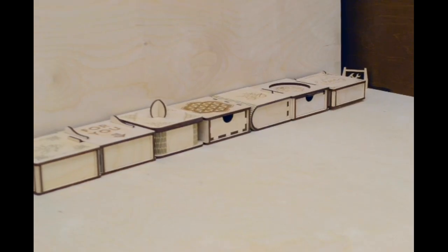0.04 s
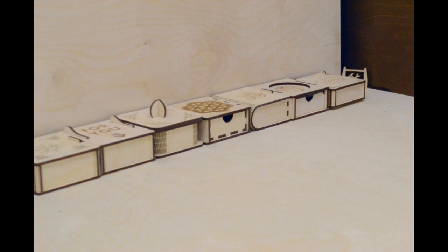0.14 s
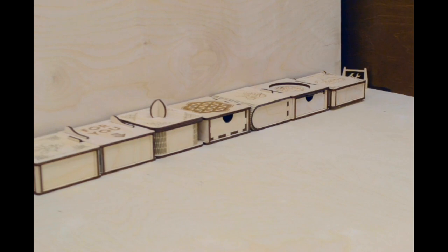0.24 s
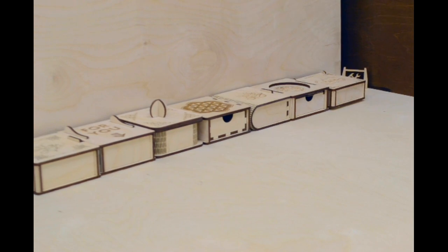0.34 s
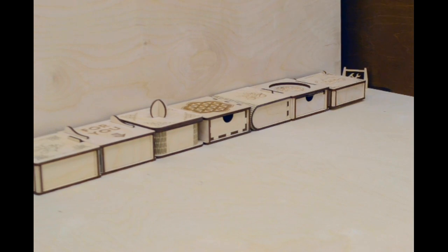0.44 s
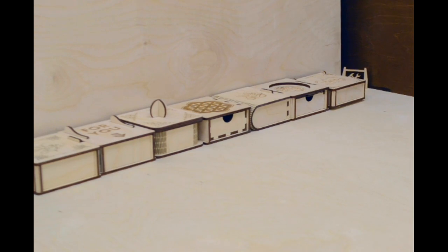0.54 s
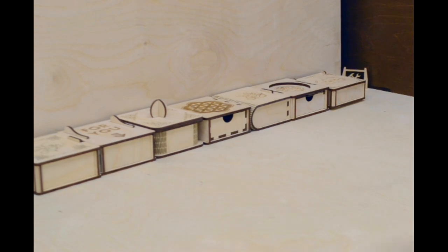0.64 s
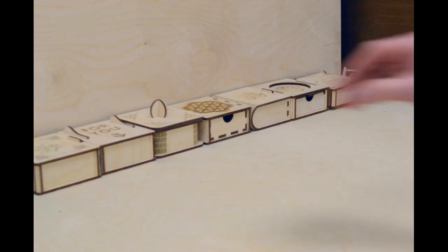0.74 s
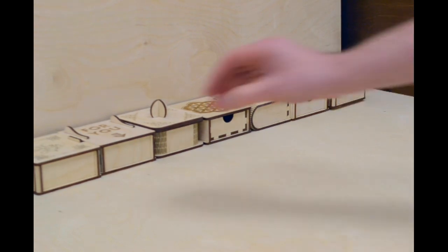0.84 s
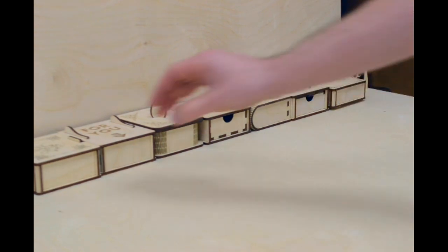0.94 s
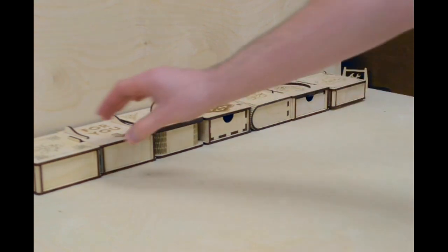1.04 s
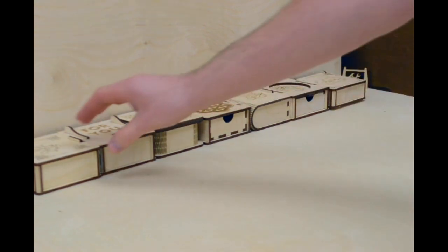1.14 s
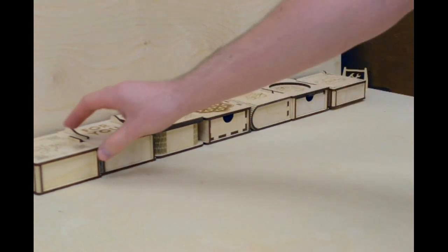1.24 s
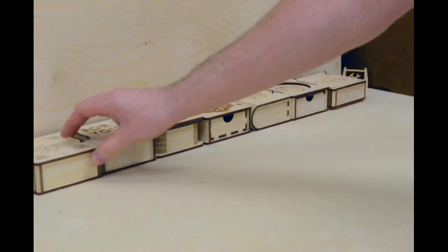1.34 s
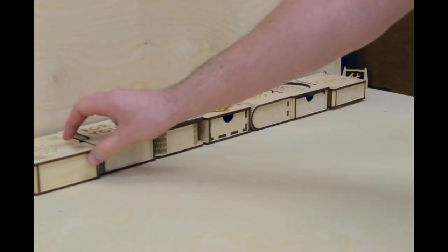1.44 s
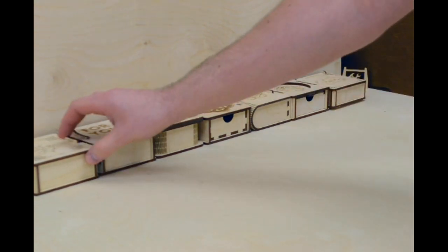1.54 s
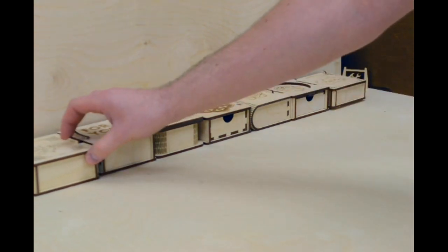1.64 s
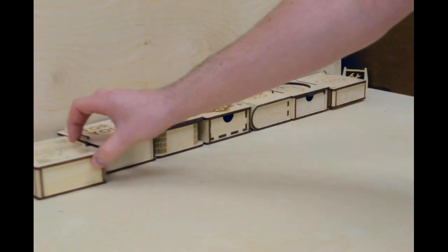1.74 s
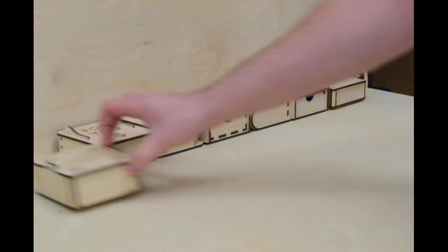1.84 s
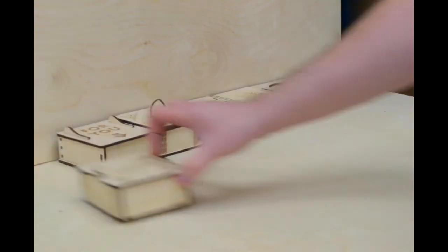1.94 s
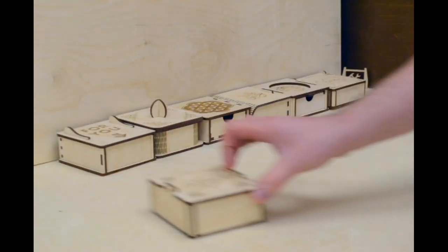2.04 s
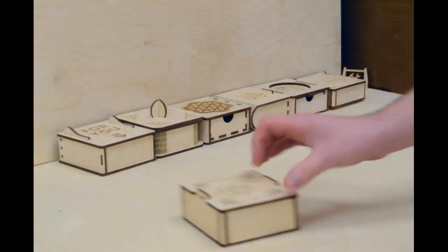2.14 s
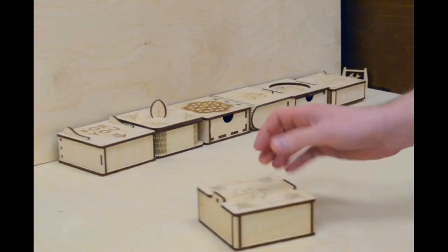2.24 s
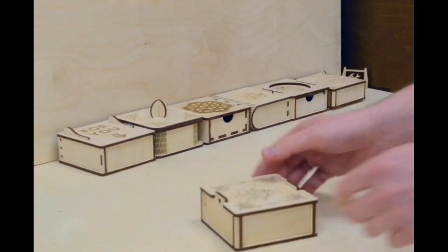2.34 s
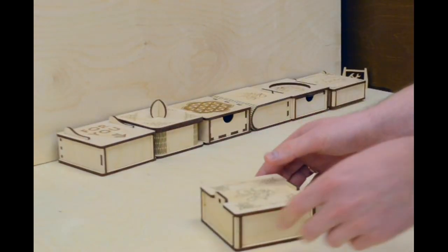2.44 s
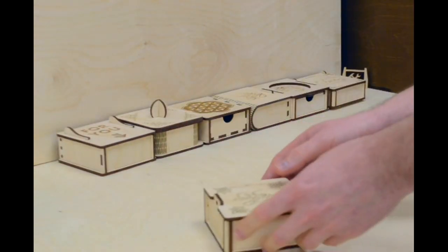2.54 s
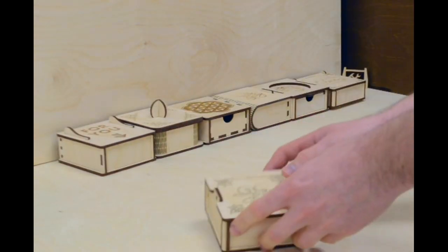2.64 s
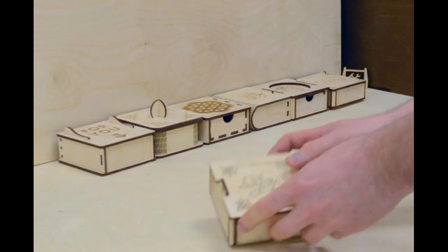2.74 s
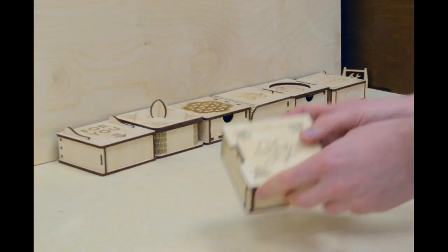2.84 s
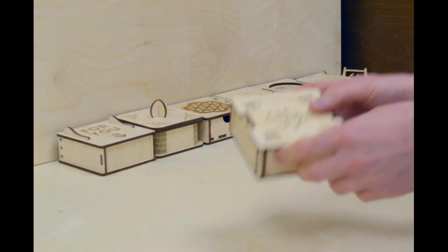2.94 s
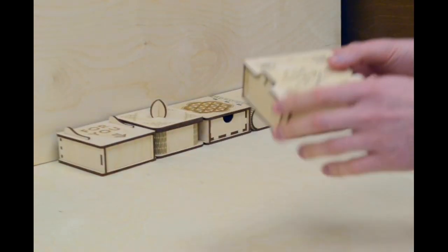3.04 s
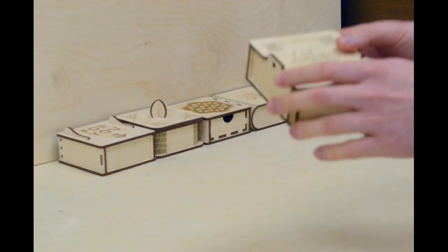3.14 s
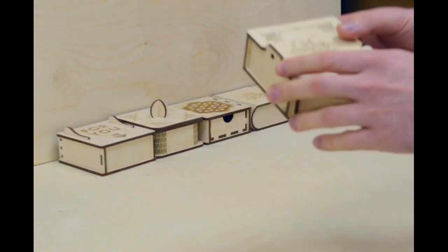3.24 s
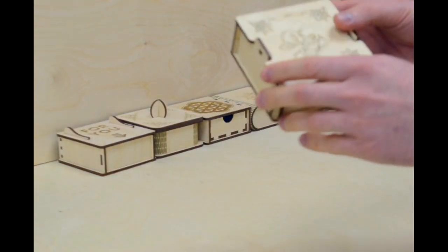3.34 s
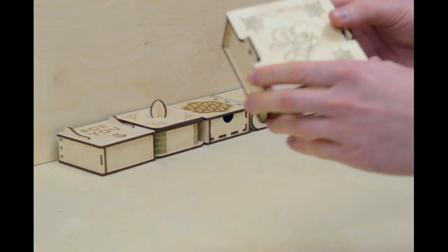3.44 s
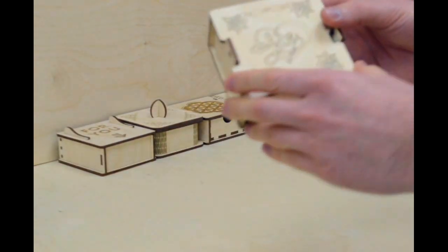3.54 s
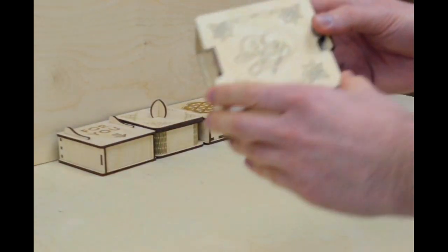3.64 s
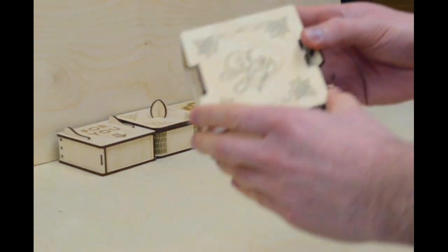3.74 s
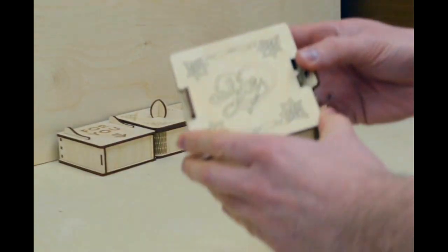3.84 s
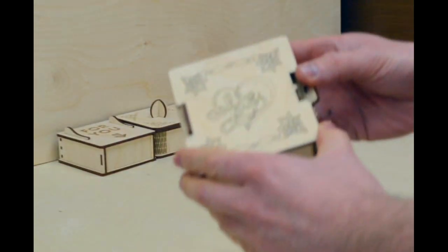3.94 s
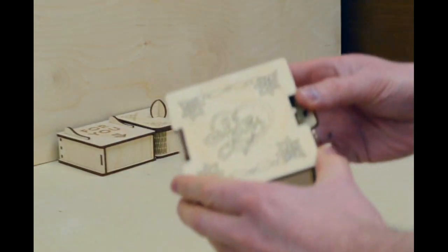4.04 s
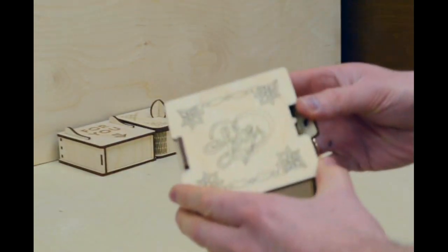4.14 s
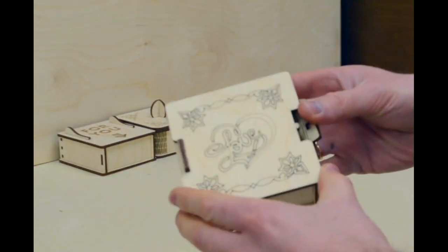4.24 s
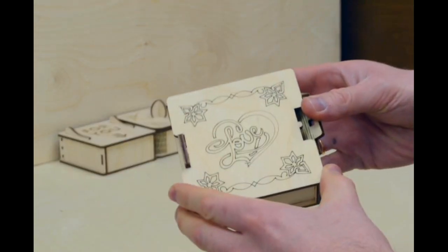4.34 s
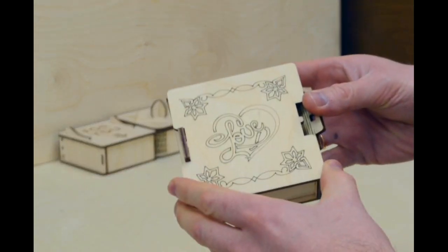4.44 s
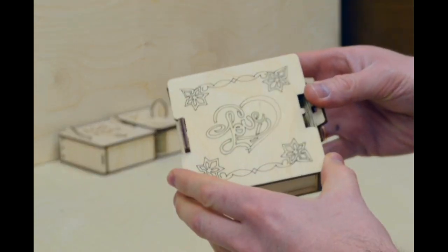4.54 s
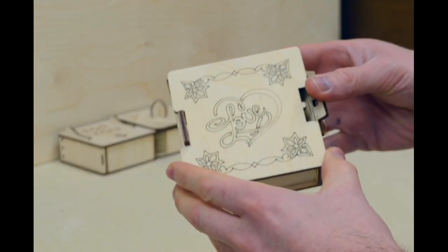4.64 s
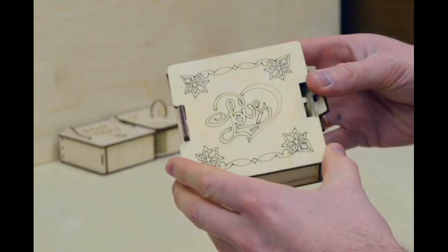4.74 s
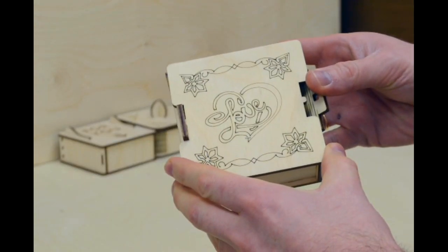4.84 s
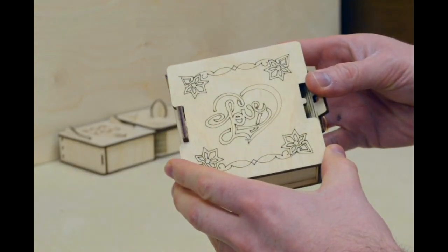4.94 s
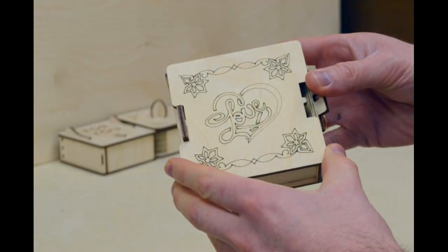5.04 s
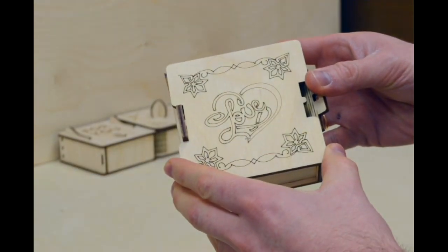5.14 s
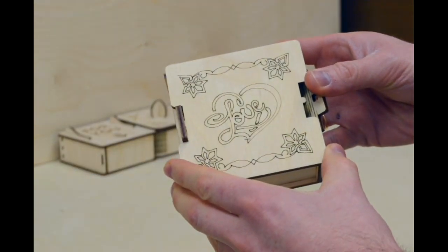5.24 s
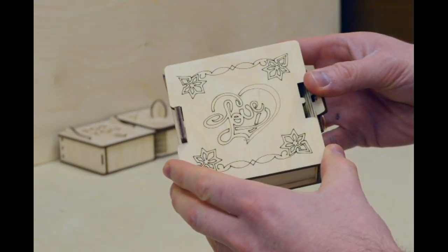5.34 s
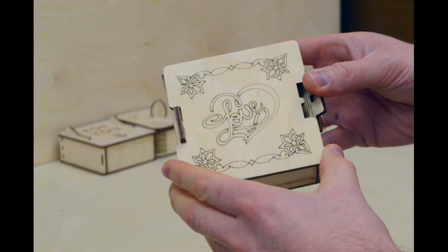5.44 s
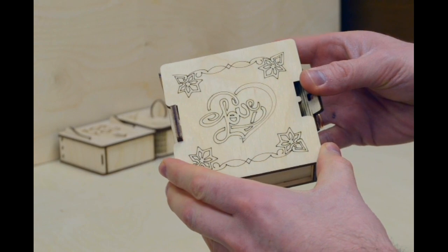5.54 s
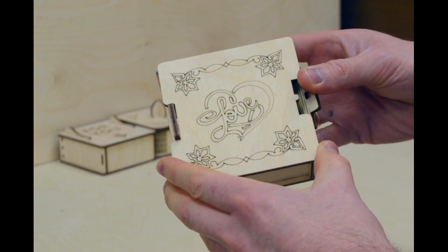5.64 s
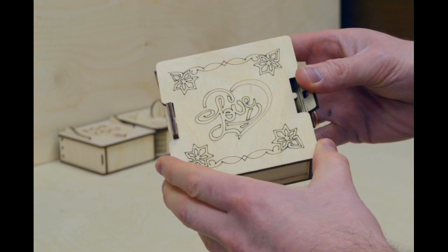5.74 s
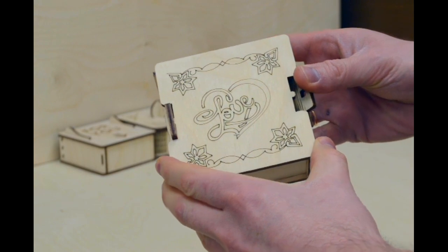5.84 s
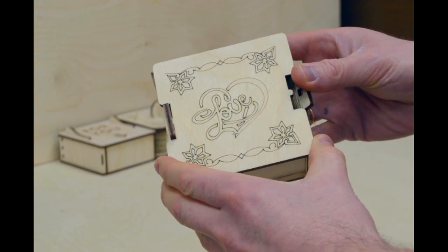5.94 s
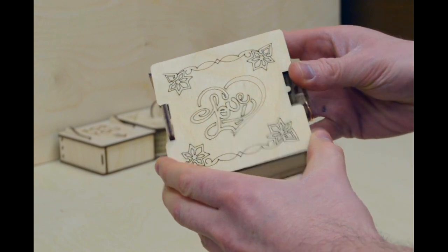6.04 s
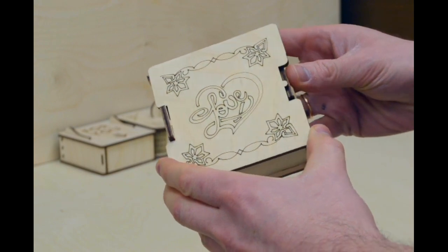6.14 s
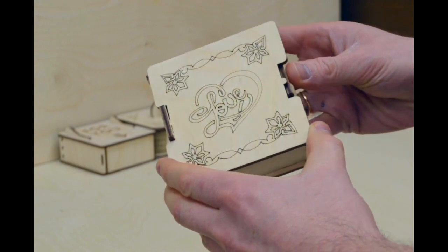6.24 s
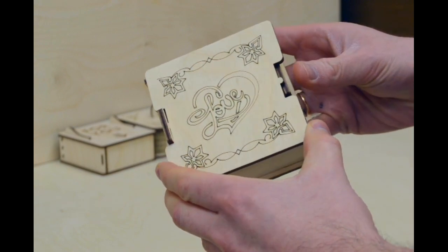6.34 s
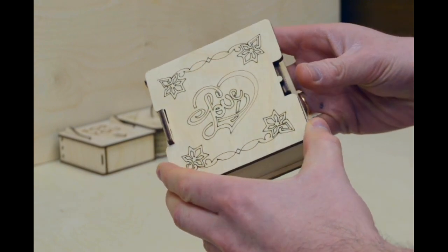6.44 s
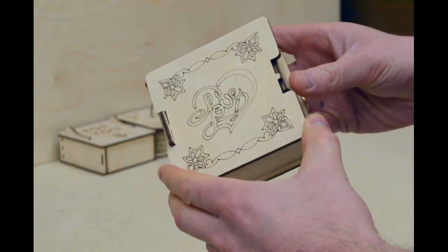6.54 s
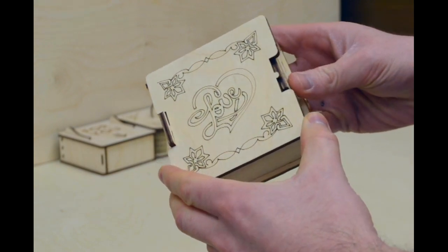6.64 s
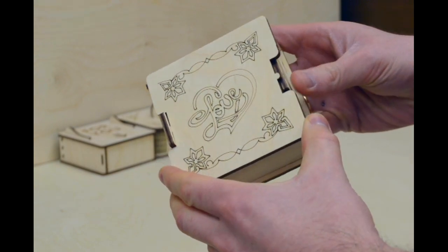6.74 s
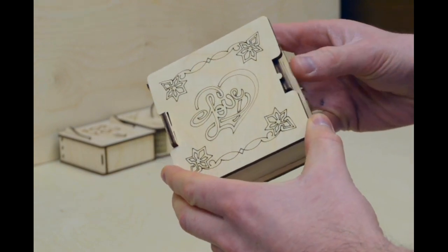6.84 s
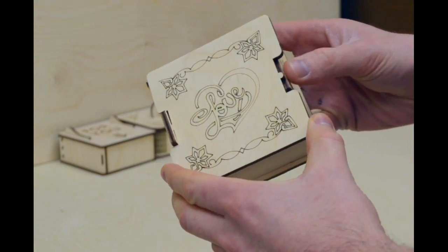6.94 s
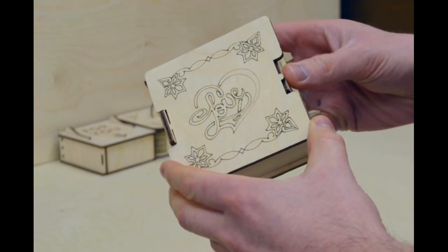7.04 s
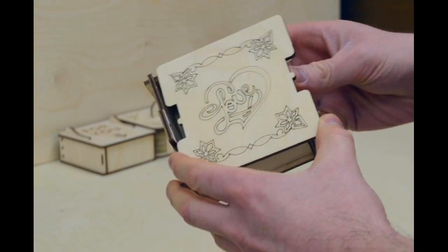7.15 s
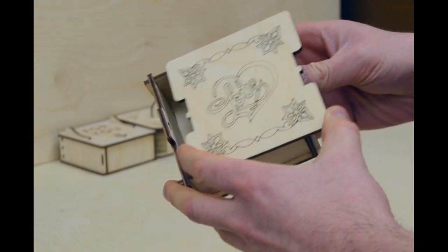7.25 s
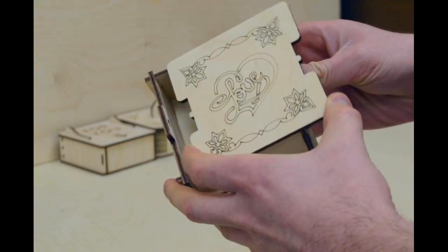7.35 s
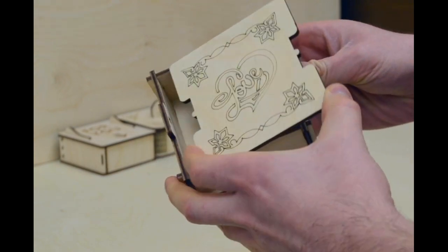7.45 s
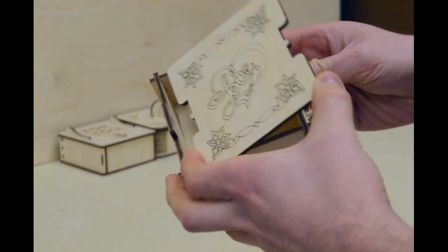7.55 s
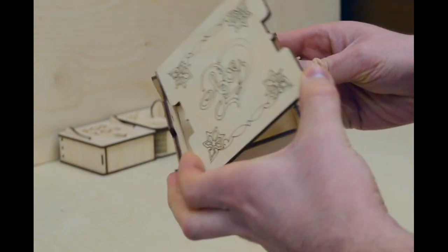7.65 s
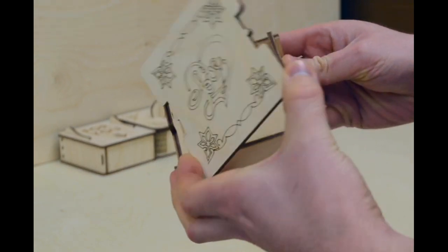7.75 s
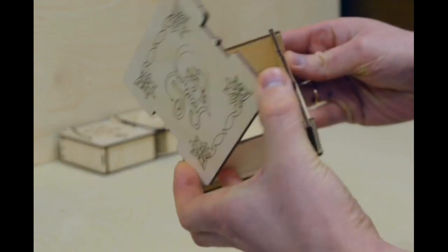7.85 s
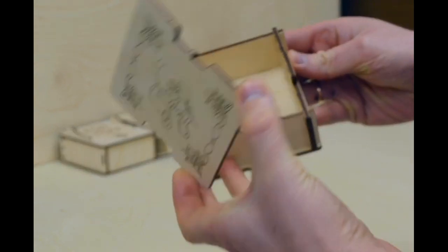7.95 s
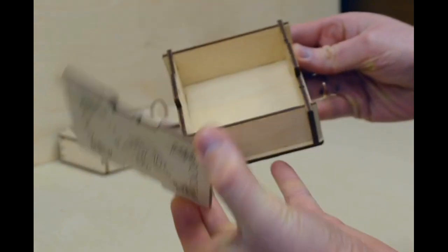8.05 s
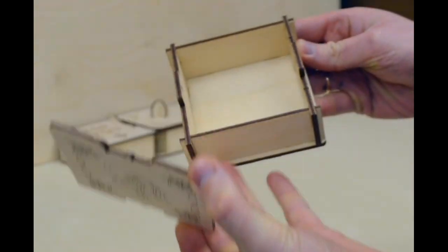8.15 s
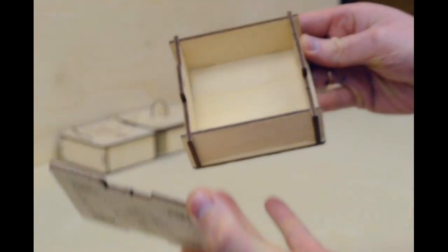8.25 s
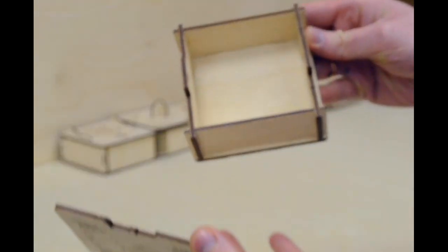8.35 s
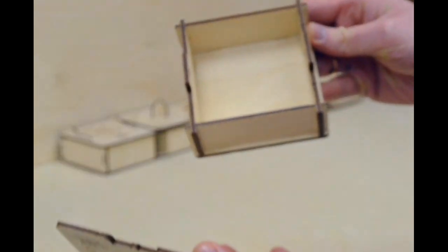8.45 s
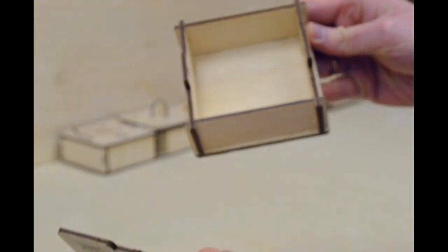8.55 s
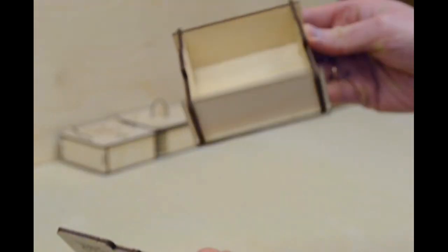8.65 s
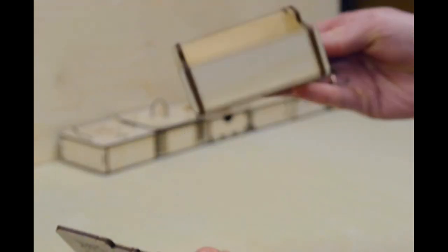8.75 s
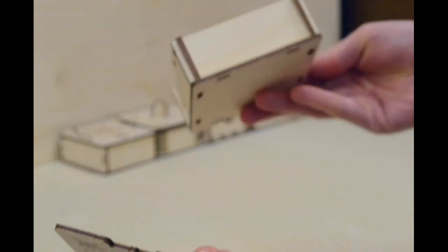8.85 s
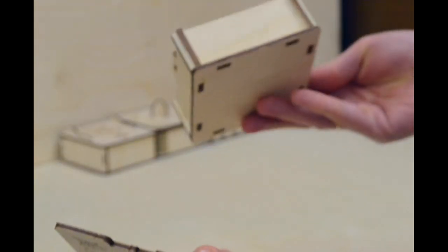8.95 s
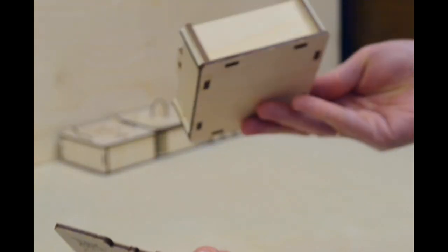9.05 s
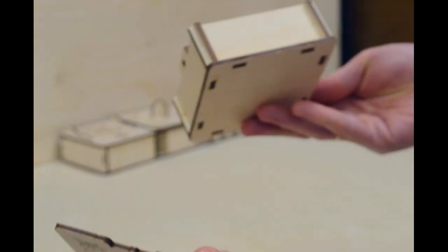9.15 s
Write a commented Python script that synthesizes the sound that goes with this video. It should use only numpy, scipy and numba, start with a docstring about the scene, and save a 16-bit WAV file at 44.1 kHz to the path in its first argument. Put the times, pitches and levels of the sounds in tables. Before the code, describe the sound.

Indoors, hands slide and handle a light plywood box, snap its catch and pull the lid away while a nearby lens motor clicks and buzzes.

```python
"""Hands slide a small plywood box across a table, pick it up, snap its catch open and scrape the lid off.
Filtered noise bursts knock, swelling grains of noise rub and scrape, and decaying sines ring the lid.
A diffuse tail places the wood in a small, quiet room. Close to the microphone a camera's focus motor ticks,
whirrs and stops in short runs, made of noise and unsteady tones through the lens barrel's resonances.
Cloth swishes near the start, and steady noise gives the air of the room."""
import sys
import numpy as np
from scipy import signal
from scipy.fft import rfft, irfft
from scipy.io import wavfile
from scipy.ndimage import uniform_filter1d
from numba import njit

SR = 44100
rng = np.random.default_rng(int(sys.argv[2]) if len(sys.argv) > 2 else 0)


def transcribe(signal):
    """Save signal, clipped to [-1, 1], as a 16-bit WAV file at the path in sys.argv[1]."""
    frames = np.atleast_2d(signal).T
    limited = np.clip(frames, -1, 1)
    pcm = np.round(limited * 32767).astype(np.int16)
    wavfile.write(sys.argv[1], SR, pcm)


N = 405719
TIME = np.arange(N) / SR  # seconds
TOP_HZ = 11200  # upper edge of the sound

# Resonances of the wooden box. Each row: centre in Hz, width in Hz, height over the broad spectrum in dB.
BOX_RESONANCES = [(607, 43, 2), (736, 21, 1.5), (917, 74, 1.5), (1216, 46, 1), (1316, 85, -1.5),
                  (1780, 66, -6), (2220, 56, 4)]
# Runs of the focus motor. Each row: start in seconds, stop in seconds, relative level of the rebound in dB,
# gear pitch in Hz that the run climbs towards.
FOCUS_RUNS = [(1.931, 1.983, -23, 5030), (2.093, 2.137, 5.5, 4980), (2.218, 2.276, 0.5, 5020),
              (2.385, 2.456, 5, 4970), (3.6798, 3.735, -25, 5130), (3.8005, 3.847, 0, 5150),
              (3.9264, 3.984, -12, 5460), (4.0542, 4.55, -6.5, 5050), (4.5897, 4.725, 3.5, 6250),
              (7.1816, 7.233, 2.5, 5460), (7.347, 7.395, 4.5, 5420), (7.518, 7.574, -7, 5630),
              (7.641, 7.924, 2, 5500), (7.979, 8.091, 2.5, 5000), (8.14, 8.314, -3, 6580)]
# Resonances of the lens barrel. Each row: centre in Hz, width in Hz, height over the broad spectrum in dB.
BARREL_RESONANCES = [(1060, 54, 13), (1276, 37, 6), (1803, 71, 15.5), (2250, 42, 8.5), (2606, 60, 20.5),
                     (2989, 112, 20), (3830, 190, 11), (4587, 184, 16.5), (4966, 38, 14), (5490, 96, 11.5),
                     (8620, 350, 7.5), (9500, 440, 6)]


def undb(db):
    """Decibels to gain."""
    return 10 ** (np.asarray(db) / 20)


def walk(rate):
    """Smooth chance with a spread near 1, drawn anew about rate times a second."""
    size = int(SR / rate)
    held = np.repeat(rng.standard_normal(N // size + 1), size)
    return 1.2 * uniform_filter1d(held, size)[:N]


def grains(spread_db):
    """Dense tiny contacts of uneven size; rms 1."""
    size = 16  # samples that share one level
    levels = undb(spread_db * rng.standard_normal(N // size + 1))
    x = rng.standard_normal(N) * np.repeat(levels, size)[:N]
    return x / x.std()


def burst(decay):
    """A rough contact: chatter that dies away over decay seconds, starting at rms 1."""
    t = TIME[:SR // 5]
    x = rng.standard_normal(len(t)) * np.exp(-t / decay)
    return x * np.sqrt(decay * SR / 2 / np.sum(x ** 2))


def add(track, s, x):
    """Mix a sound into a track at time s."""
    i = max(int(s * SR), 0)
    track[i:i + len(x)] += x[:N - i]


def contacts(times, dbs, decay):
    """A track of rough contacts."""
    track = np.zeros(N)
    for s, db in zip(times, dbs + np.zeros(len(times))):
        add(track, s, undb(db) * burst(decay))
    return track


def strokes(rows, column=4):
    """Gain of strokes that swell, hold and die away; attack and release are the times of a tenfold change."""
    power = np.zeros(N)
    for row in rows:
        s, attack, hold, release = row[:4]
        before = np.maximum(s - TIME, 0) / attack
        after = np.maximum(TIME - s - hold, 0) / release
        fade = before + after
        near = fade < 4
        power[near] += undb(row[column] - 20 * fade[near]) ** 2
    return np.sqrt(power)


def wavering_tone(hz, width_hz, rate):
    """An unsteady tone around a given pitch; rms 1."""
    phase = 2 * np.pi * np.cumsum(hz + width_hz * walk(rate)) / SR
    return np.sqrt(2) * np.sin(phase)


def body(x, colour, peaks=()):
    """Causal filter of unit power gain: a broad spectrum with resonances standing on it."""
    size = 8192
    hz = np.maximum(np.arange(size // 2 + 1) * SR / size, 1)
    points = np.array(colour)
    power = undb(np.interp(np.log(hz), np.log(points[:, 0]), points[:, 1])) ** 2
    power = power * (1 + sum(undb(db) ** 2 / (1 + (2 * (hz - f) / width) ** 2) for f, width, db in peaks))
    power = power / (1 + (hz / TOP_HZ) ** 40)
    # folding the cepstrum forward gives minimum phase, so nothing sounds ahead of its cause
    cepstrum = irfft(np.log(power / power.mean()) / 2)
    cepstrum[1:size // 2] *= 2
    cepstrum[size // 2 + 1:] = 0
    return signal.fftconvolve(x, irfft(np.exp(rfft(cepstrum))))[:N]


def band(x, hz, width):
    """Steep band-pass that keeps the energy of a short sound."""
    low = np.hypot(hz, width / 2) - width / 2
    high = min(low + width, SR / 2 - 1)
    y = signal.sosfilt(signal.butter(2, [low, high], "band", fs=SR, output="sos"), x)
    return y * np.linalg.norm(x) / np.linalg.norm(y)


@njit
def moving_band(x, hz, width):
    """State-variable resonance whose centre and width move; gain 1 at the centre."""
    y, b, low = np.empty(len(x)), 0., 0.
    for i in range(len(x)):
        g, k = np.tan(np.pi * hz[i] / SR), width[i] / hz[i]
        v = (b + g * (x[i] + 1e-18 - low)) / (1 + g * (g + k))
        b, low, y[i] = 2 * v - b, low + 2 * g * v, k * v
    return y


def slides():
    """Wood grain catches on the table and on skin: a hollow rub under a fine hiss, both in short surges."""
    # The box is drawn out, lurches free and glides over the table. Each row: start in seconds,
    # attack in seconds, hold in seconds, release in seconds, relative rub and hiss levels in dB.
    drag_rows = [(1.74, 0.087, 0.016, 0.14, -47, -51.5), (1.816, 0.0066, 0.036, 0.13, -37, -52),
                 (1.86, 0.14, 0.21, 0.19, -40.5, -46.5)]
    # Fingers rub and shift on the box; at the last row the lid hisses as it slides off. Each row: start
    # in seconds, attack in seconds, hold in seconds, release in seconds, relative rub and hiss levels in dB.
    rub_rows = [(1.438, 0.019, .012, 0.16, -70, -63.5), (1.53, 0.039, .006, 0.056, -52, -69),
                (2.50, 0.09, 0.1, 0.14, -52.5, -64), (2.634, 0.12, 0.086, 0.064, -46.5, -58.5),
                (2.85, .006, 0.0086, 0.056, -53.5, -56.5), (2.941, 0.099, .004, 0.07, -59, -62),
                (3.12, 0.34, 0.11, 0.055, -65.5, -72), (3.288, .05, 0.1, 0.13, -60, -66.5),
                (3.50, 0.12, 0.15, .08, -65.5, -78.5), (7.911, 0.055, 0.024, 0.076, -58, -60.5)]
    # Broad spectrum of the hollow rub. Each row: frequency in Hz, relative level in dB.
    rub_colour = [(60, -22), (150, -18.5), (350, 0), (800, 2.5), (1400, 5.5), (2500, -3.5), (5000, -12.5),
                  (10000, -35)]
    # Broad spectrum of the fine hiss. Each row: frequency in Hz, relative level in dB.
    hiss_colour = [(500, -26.5), (2000, 8.5), (4500, 4.5), (6500, 4), (7800, -0.5), (8700, 6), (10000, 2.5),
                   (11500, -16.5)]
    rows = drag_rows + rub_rows
    catching = undb(2.1 * walk(55))
    rub = strokes(rows, column=4) * grains(spread_db=3.5) * undb(1.4 * walk(200))
    hiss = strokes(rows, column=5) * grains(spread_db=2.5)
    hollow = body(catching * rub, rub_colour, BOX_RESONANCES)
    fine = body(catching * hiss, hiss_colour)
    return undb(-5.5) * hollow + undb(1.0) * fine


def judder():
    """Stick and slip on the table groans unsteadily around the lowest mode of the box floor."""
    # The dragged box judders. Each row: time in seconds, relative level in dB.
    judder_rows = [(1.819, -44), (1.844, -39), (1.877, -30), (1.901, -42)]
    attack_s, hold_s, release_s = 0.015, .006, 0.019
    groan = wavering_tone(746, width_hz=55, rate=220)
    grip = strokes([(s, attack_s, hold_s, release_s, db) for s, db in judder_rows])
    return grip * groan * undb(3.2 * walk(120))


def bumps():
    """Knocks of wood and fingers; a broad knock may take several rows, one for each frequency range."""
    # Each row: time in seconds, relative level in dB, centre in Hz, width in Hz, contact decay in seconds.
    knock_rows = [(.042, -53, 367, 397, 0.0051), (.262, -53.5, 1410, 890, 0.033),
                  (.663, -57, 546, 800, 0.026), (1.432, -56.5, 533, 690, 0.023),
                  (1.540, -54.5, 413, 700, 0.042), (1.815, -32, 770, 1000, 0.011),
                  (1.846, -34, 4500, 6000, 0.016), (1.870, -36, 1400, 400, 0.015),
                  (1.997, -41, 354, 610, 0.0082), (2.489, -33.5, 2400, 6730, 0.0092),
                  (2.648, -48.5, 1140, 700, 0.017), (2.720, -48, 1410, 2000, 0.0054),
                  (2.946, -45.5, 700, 1380, 0.0085), (3.323, -45, 1160, 2980, 0.01),
                  (3.375, -55, 600, 1500, 0.017), (3.597, -56, 7000, 6000, .004),
                  (6.445, -52.5, 9010, 2500, 0.0031), (7.013, -56, 1500, 706, 0.009),
                  (7.109, -31, 2000, 1800, 0.0052), (7.110, -35.5, 6000, 7000, 0.013),
                  (7.123, -27, 1094, 587, 0.0043), (7.133, -26.5, 1030, 297, 0.0019),
                  (7.241, -39, 1410, 1297, .0035)]
    knocks = np.zeros(N)
    for s, db, hz, width, decay in knock_rows:
        add(knocks, s, undb(db) * band(burst(decay), hz, width))
    colour = [(60, -22), (250, 9.0), (1000, 6.5), (3000, 6), (8000, -2.5), (11000, -9.5)]  # (Hz, dB)
    return body(knocks, colour, BOX_RESONANCES)


def squeak():
    """Skin sticks and slips faintly on the wood with an unsteady pitch."""
    # Each row: start in seconds, attack in seconds, hold in seconds, release in seconds, relative level in dB.
    squeak_rows = [(3.17, .08, 0.093, .06, -67)]
    return strokes(squeak_rows) * wavering_tone(900, width_hz=59, rate=230)


def snap(rise=0.0012):
    """The catch slips in a few quick steps; each cracks and pumps up the ringing of the lid."""
    # Steps of the catch. Each row: time in seconds, relative ring level in dB, relative crack level in dB.
    step_rows = [(6.0917, 0.5, -43.5), (6.0948, 6, -19), (6.0974, -6.5, -16.5), (6.1006, -1, -20.5)]
    # Modes of the snapped lid. Each row: frequency in Hz, relative level in dB, 60 dB decay in seconds.
    lid_modes = [(276.4, -42, 0.02), (453.3, -36.5, 0.05), (636, -30, .07), (680, -41, 0.31),
                 (759, -28, 0.057), (815.6, -23.5, 0.061), (873, -32, .24), (893, -36, .24),
                 (928.3, -37, 0.29), (1223, -34, 0.082), (1426, -18, 0.056), (1500, -32, 0.17),
                 (1540, -20, 0.029), (1633, -28.5, 0.037), (1777, -31, .04), (2000, -26.5, .03),
                 (2436, -24, .04), (2465, -38, 0.13), (2566, -24, 0.03)]
    # Broad spectrum of the crack. Each row: frequency in Hz, relative level in dB.
    crack_colour = [(80, -36), (190, -19), (280, -6), (370, -5), (600, -4), (1500, 5.5), (2700, -2.5),
                    (3400, -8.5), (5000, -6.5), (7500, -13.5), (9300, -9.5), (11000, -25)]
    times, ring_dbs, crack_dbs = np.transpose(step_rows)
    t = TIME[:SR // 2]
    since = np.maximum(t - (times - times[0])[:, None], 0)
    pushes = undb(ring_dbs - 3.0)[:, None] * (1 - np.exp(-since / rise))
    ring = np.zeros(N)
    for hz, db, t60 in lid_modes:
        swing = np.sum(pushes * np.exp(-np.log(1000) * since / t60), axis=0)
        add(ring, times[0], undb(db) * swing * np.sin(2 * np.pi * hz * t))
    # a small plate radiates no bass
    ring = signal.sosfilt(signal.butter(4, 250, "high", fs=SR, output="sos"), ring)
    crack = body(contacts(times, crack_dbs, decay=0.0037), crack_colour)
    return room(ring, wet_db=-13.0) + room(crack, wet_db=-10.0)


def scrape():
    """The lid sticks and slips along the rim; the cavity rises in pitch and loses its ring as the gap opens."""
    # The lid is nudged, shoved along the rim and eased off. Each row: start in seconds, attack in seconds,
    # hold in seconds, release in seconds, relative level in dB.
    scrape_rows = [(6.61, 0.023, 0.044, .09, -56.5), (6.94, 0.014, .12, .08, -59.5),
                   (7.115, 0.036, .17, 0.035, -41), (7.335, .07, 0.011, 0.22, -47),
                   (7.52, 0.11, 0.52, 0.048, -59), (7.70, .05, 0.017, 0.045, -49.5)]
    # Broad spectrum of the scrape. Each row: frequency in Hz, relative level in dB.
    scrape_colour = [(60, -40), (200, -13.5), (500, -10.5), (800, 4.5), (1500, 5.5), (2100, -5), (2700, 0),
                     (4000, -8), (5200, -6), (7500, -17.5), (9000, -10.5), (11000, -25)]
    # Resonance of the scrape. Each row: centre in Hz, width in Hz, height over the broad spectrum in dB.
    scrape_resonances = [(1550, 100, 3)]
    opens_s, opening_time_s = 7.27, 0.38
    closed_hz, open_hz = 990, 1664
    closed_width_hz, open_width_hz = 110, 720  # rough width of the two filter stages together
    gap = 1 - np.exp(-np.maximum(TIME - opens_s, 0) / opening_time_s)
    hz = closed_hz + gap * (open_hz - closed_hz)
    width = closed_width_hz + gap * (open_width_hz - closed_width_hz)
    catching = undb(3 * walk(110) - 1)
    slips = strokes(scrape_rows) * grains(spread_db=3.0) * catching
    cavity = moving_band(moving_band(slips, hz, 1.37 * width), hz, 1.5 * width)
    cavity = cavity * np.sqrt(SR / 2 / width)  # makes up for the power that a narrow band loses
    return undb(-7.0) * cavity + undb(-8) * body(slips, scrape_colour, scrape_resonances)


def cloth():
    """Cloth fibres brush in soft swishes near the start."""
    # Each row: time in seconds, relative level in dB.
    swish_rows = [(.05, -63.5), (.185, -58), (.68, -62), (.825, -55.5)]
    # Broad spectrum of the cloth. Each row: frequency in Hz, relative level in dB.
    cloth_colour = [(59, -40), (100, -9.5), (711, -5.5), (995, -7.5), (2330, -1.5), (7810, -14),
                    (8970, -10), (11400, -26), (14800, -66), (22000, -120)]
    attack_s, hold_s, release_s = 0.079, 0.0053, 0.17
    swish = strokes([(s, attack_s, hold_s, release_s, db) for s, db in swish_rows])
    return undb(-1.5) * body(swish * grains(spread_db=2.5), cloth_colour)


def focus_motor(spin_up=0.034, turn_hz=126.0, turn_depth=0.14):
    """Each run: a tick, gear play clattering to a rebound, a whirr, and a tap as the lens stops."""
    # Spectra of the motor's sounds ahead of the barrel: tick, clatter, whirr and stopping tap.
    # Each row: frequency in Hz, relative level in dB.
    tick_colour = [(70, -22), (200, -21), (1000, -12.5), (3000, -3), (5000, -8.5), (6500, 5), (7400, 5),
                   (7950, -6.5), (8600, 0.5), (9900, -1.5), (11300, -18)]
    clatter_colour = [(70, -44), (200, -37), (1000, 1), (2000, 2), (3400, 4.5), (5000, -2.5), (7000, -2),
                      (8000, -11), (9500, -11), (11300, -23)]
    whirr_colour = [(100, -22), (350, -6), (1500, 2.5), (4000, -0.5), (5800, 6.5), (7400, 2.5), (7950, -10),
                    (8500, -3.5), (10500, -7), (11500, -25)]
    tap_colour = [(60, -18), (150, -28), (900, -6), (2000, -3), (2700, 4), (3600, -7.5), (6000, -5.5),
                  (8000, -12.5), (9500, -13.5), (11300, -35)]
    start, stop, rebound_db, top_hz = np.transpose(FOCUS_RUNS)
    rebound = start + .0152  # the gear play is taken up this many seconds after the start
    running, pitch = np.zeros(N), np.zeros(N)
    for t0, t1, hz in zip(start, stop, top_hz):
        t = TIME[:int((t1 - t0) * SR)]
        add(running, t0, undb(-53.5) * np.ones(len(t)))
        add(pitch, t0, hz * (1 - np.exp(-t / spin_up)))
    running = running * (1 + turn_depth * np.sin(2 * np.pi * turn_hz * TIME))
    rough = running * grains(spread_db=3.5) * undb(2.5 * walk(50))
    whirr = body(rough, whirr_colour, BARREL_RESONANCES)
    whine = undb(-11) * running * wavering_tone(pitch, width_hz=230, rate=700)
    clicks = contacts(start, -34.5, decay=0.0014) + contacts(rebound, rebound_db - 36.0, decay=0.0013)
    ticks = body(clicks, tick_colour, BARREL_RESONANCES)
    play = contacts(start + .003, -41.5, decay=0.018)
    play = play + contacts(rebound - .005, rebound_db - 39.0, decay=0.0099)
    clatter = body(play, clatter_colour, BARREL_RESONANCES)
    taps = body(contacts(stop, -34.5, decay=.0025), tap_colour, BARREL_RESONANCES)
    return whirr + whine + ticks + clatter + taps


def lens_shake(climb=11, waver_hz=220, thud_decay=0.004):
    """The gears shake the barrel with a rising buzz; the lens group thuds then, and at every stop."""
    # Surges within the longer runs, as the gears pass the barrel's resonances. Each row: time of the peak
    # in seconds, relative buzz level in dB, half length of the swell in seconds, pitch at the peak in Hz,
    # relative thud level in dB.
    surge_rows = [(4.095, -37, .008, 3950, -53), (4.647, -38, 0.013, 3200, -51),
                  (7.684, -37, 0.01, 3180, -43.5), (8.024, -36.5, 0.0068, 3400, -44),
                  (8.057, -41, .02, 3360, -69), (8.175, -37, 0.015, 3240, -39),
                  (8.22, -34, 0.011, 3360, -68)]
    # Spectrum of the buzz ahead of the barrel. Each row: frequency in Hz, relative level in dB.
    buzz_colour = [(100, -13), (1000, -4), (3800, -2), (5500, -15), (8000, -16), (11000, -24)]
    # Broad spectrum of the thud. Each row: frequency in Hz, relative level in dB.
    thud_colour = [(70, -27), (170, -5.5), (330, 3), (600, -3.5), (950, -0.5), (1500, -10), (3000, -36)]
    gear_ratio = 1.3  # a second wheel sings above the first
    rattle, tone = np.zeros(N), np.zeros(N)
    jolts = contacts([run[1] for run in FOCUS_RUNS], -57.5, decay=thud_decay)
    for s, db, half, hz, thud_db in surge_rows:
        t = TIME[:SR // 5] - .1  # seconds from the peak
        swell = undb(db) * np.exp(-(t / half) ** 2 / 2)
        pitch = hz * np.exp(climb * t) + waver_hz * walk(700)[:len(t)]
        phase = 2 * np.pi * np.cumsum(pitch) / SR
        wheels = np.sin(phase) + undb(-7.5) * np.sin(gear_ratio * phase)
        add(rattle, s + t[0], swell * rng.standard_normal(len(t)))
        add(tone, s + t[0], swell * wheels)
        add(jolts, s, undb(thud_db) * burst(decay=thud_decay))
    buzz = body(rattle, buzz_colour, BARREL_RESONANCES)
    thud = body(jolts, thud_colour, [(336, 70, 1)])  # one resonance (Hz, width Hz, dB)
    return undb(-8.5) * buzz + undb(-9) * tone + thud


def room(x, wet_db, gap=0.0069):
    """Direct sound plus diffuse reflections whose treble dies first; they fade in after gap seconds."""
    # Reverberation of the small room. Each row: frequency in Hz, 60 dB decay in seconds.
    decay_rows = [(200, 0.3), (900, 0.35), (2500, 0.32), (9000, 0.23)]
    t = TIME[:SR // 2]
    hz = np.arange(len(t) // 2 + 1) * SR / len(t)
    noise = rfft(rng.standard_normal(len(t)))
    centres, t60s = np.transpose(decay_rows)
    tail = np.zeros(len(t))
    for share, t60 in zip(np.eye(len(t60s)), t60s):  # overlapping bands that add up to the whole
        part = irfft(noise * np.interp(hz, centres, share), len(t))
        tail += part * np.exp(-np.log(1000) * t / t60)
    tail = tail * np.clip(t / gap - 1, 0, 1)
    return x + undb(wet_db) * signal.fftconvolve(x, tail / np.linalg.norm(tail))[:N]


def room_air():
    """The quiet room: steady noise, strongest in the middle range."""
    # Broad spectrum of the air. Each row: frequency in Hz, relative level in dB.
    air_colour = [(15, -51.5), (25, -22.5), (85, -16), (166, -11), (232, -9), (418, -6.5), (554, -3),
                  (879, -7.5), (949, -5), (1390, -10.5), (2510, -13.5), (2930, -13), (3880, -19),
                  (4760, -17.5), (11400, -35.5), (14800, -71), (22000, -120)]
    return undb(-68) * body(rng.standard_normal(N), air_colour)


def scene():
    """The handling sounds in the room; the lens reaches the microphone dry, through the camera."""
    handling = undb(-6.0) * bumps() + slides() + judder() + squeak() + scrape() + cloth()
    wood = room(handling, wet_db=-9.0) + room(snap(), wet_db=-13)
    lens = focus_motor() + lens_shake()
    return (wood + lens + room_air())[None]


def record(dry):
    """The camera's microphone loses deep bass, and the top is cut."""
    thin = signal.sosfilt(signal.butter(2, 55, "high", fs=SR, output="sos"), dry)
    return signal.sosfilt(signal.ellip(8, .2, 60, TOP_HZ, fs=SR, output="sos"), thin)


dry = scene()
out = record(dry)
transcribe(out)
```